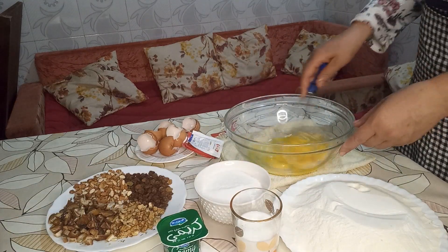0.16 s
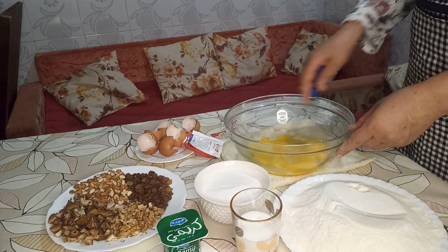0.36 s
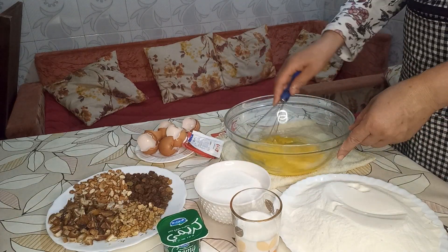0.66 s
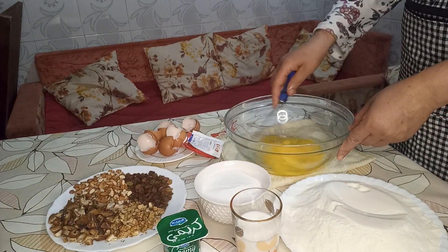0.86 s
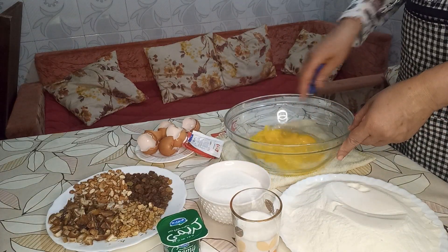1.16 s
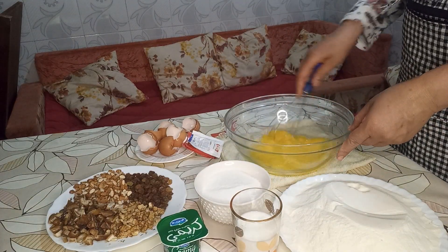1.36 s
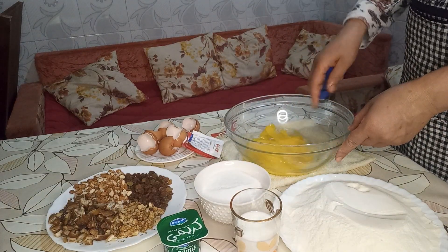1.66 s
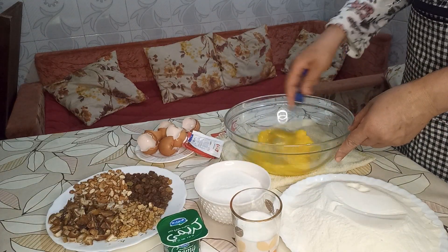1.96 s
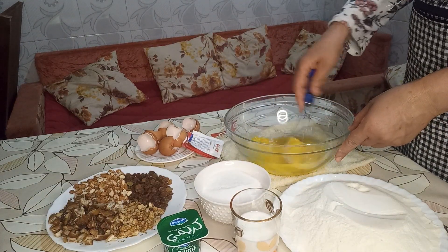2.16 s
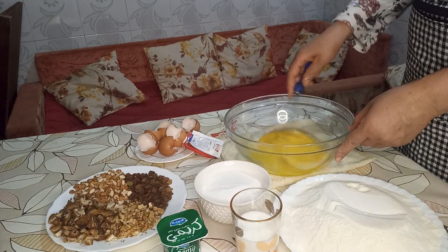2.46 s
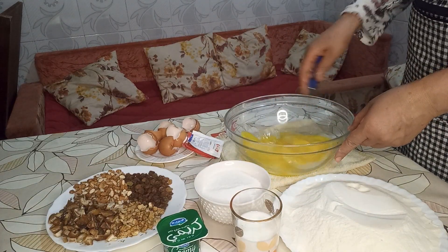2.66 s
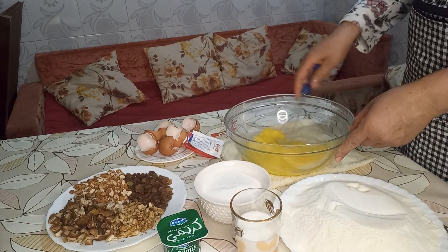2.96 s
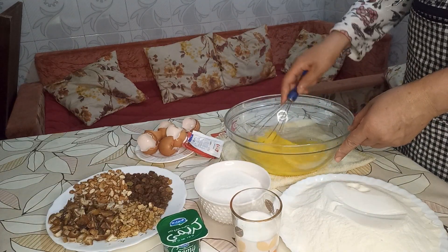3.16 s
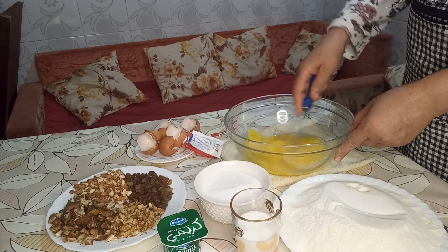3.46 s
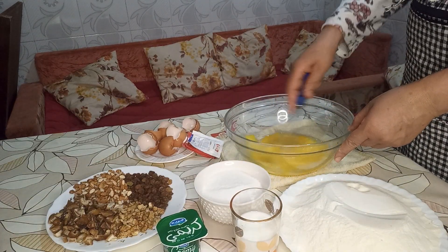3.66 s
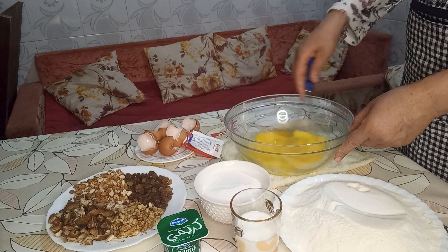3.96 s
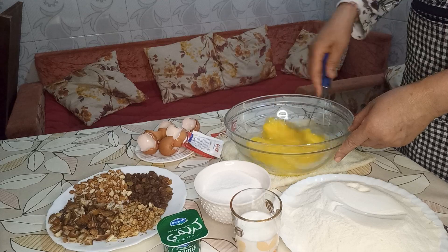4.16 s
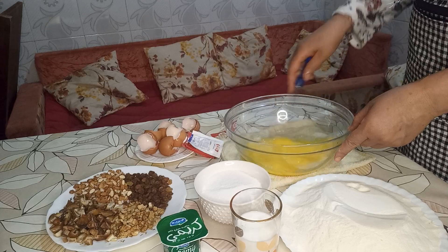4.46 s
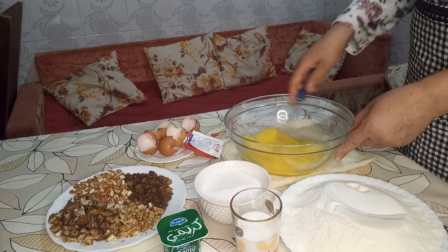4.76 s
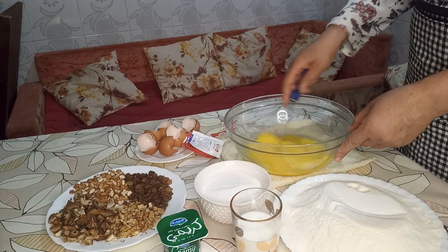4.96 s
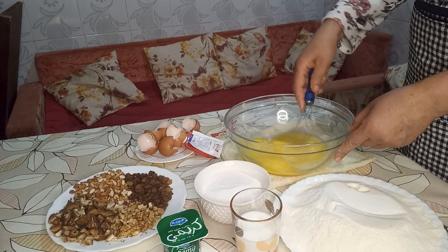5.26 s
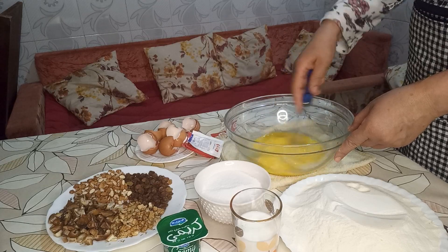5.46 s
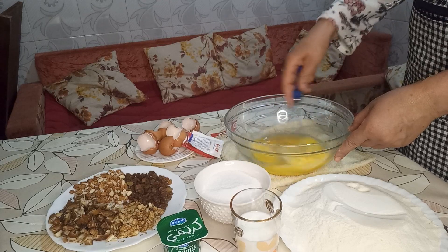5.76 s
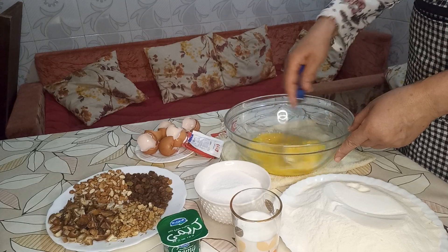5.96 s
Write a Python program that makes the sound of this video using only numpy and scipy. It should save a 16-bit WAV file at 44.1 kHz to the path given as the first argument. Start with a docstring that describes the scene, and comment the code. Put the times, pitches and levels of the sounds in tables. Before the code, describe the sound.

Eggs are whisked by hand in a thick glass bowl on a table. Bright wires drag and rattle against the wall, egg swishes, and air pockets pop with short liquid pitches. It starts fairly light, rings the bowl now and then, and turns more vigorous in the second half, ending mid-stroke. Short lively room echoes blur it; a small nearby microphone picks up little deep bass.

```python
"""A wire whisk beats raw eggs in a thick glass bowl on a table, in a bare, lively room with a faint hush.
From the start, four to five sweeps a second drag wires on glass and slosh the egg, while air pockets pop
as pitched, fading sines and wires tick as noise bursts that ring the wall; echoes blur egg and wires.
A blow near 1.5 s rings the bowl's upper deep tone, one near 2.7 s rings both; from 3.6 s strokes and pops are
mostly stronger. The strongest pop comes near 5.4 s, and the sound ends at 6.1 s in mid-beating."""
import sys
import numpy as np
from scipy import signal
from scipy.fft import rfft, irfft
from scipy.io import wavfile
from scipy.ndimage import uniform_filter1d

SR = 44100
rng = np.random.default_rng(int(sys.argv[2]) if len(sys.argv) > 2 else 0)


def wav_out(sig):
    """Save sig, one row per channel (or a flat mono array), as 16-bit PCM at SR to the path in sys.argv[1]."""
    wavfile.write(sys.argv[1], SR, np.round(np.clip(np.atleast_2d(sig).T, -1, 1) * 32767).astype(np.int16))


N = 269967

# Colour of the room hush. Each row: frequency in Hz, relative level in dB.
HUSH_COLOUR = [(25, -12.5), (100, -3), (300, -15.5), (900, -45), (2000, -2), (7000, -20), (8500, -24),
               (16500, -27)]
# How long the room's echoes last. Each row: frequency in Hz, time to fade by 60 dB in seconds.
ROOM_T60 = [(200, 0.33), (700, 0.4), (2000, 0.32), (6000, 0.25), (15000, 0.25)]
# Sweeps of the whisk at their height. Each row: time in seconds, level in dB of wires dragging on glass
# (before a trim), of egg sloshing (before a trim), of the bowl rocking on the table.
STROKES = [(0.018, -53.5, -50, -67), (0.279, -52.5, -53, -93), (.46, -50.5, -56, -97), (.69, -51, -49, -87),
           (0.908, -48, -80, -77), (1.1, -51.5, -72, -92), (1.35, -49.5, -60.5, -96),
           (1.5, -54, -50.5, -78), (1.661, -53.5, -49, -93), (1.861, -51, -53, -78),
           (2.078, -48.5, -55, -72), (2.29, -47.5, -58.5, -84), (2.54, -51, -52, -78),
           (2.768, -44, -47, -74), (2.99, -47, -53, -64.5), (3.189, -46.5, -49.5, -88),
           (3.418, -48.5, -47.5, -88), (3.652, -39.5, -44, -72), (3.86, -50.5, -49, -69),
           (4.04, -55, -53, -75), (4.289, -43, -44.5, -65), (4.528, -40.5, -42, -61.5),
           (4.75, -51.5, -60, -80), (4.958, -46.5, -49, -73), (5.191, -48, -43.5, -72),
           (5.422, -46.5, -45.5, -70), (5.642, -46.5, -46.5, -74), (5.83, -49, -53.5, -66),
           (5.98, -74, -58, -68), (6.09, -42, -45.5, -73)]
# Air pockets bursting in the egg. Each row: start in seconds, peak level in dB before the filter and the balance,
# starting pitch in Hz, cycles to fade by 50 dB (never fewer than 2 are used).
POPS = [(0.0098, -35, 1210, 8), (0.0156, -31, 563, 27), (0.0557, -38.5, 520, 10), (0.0643, -31.5, 720, 6.5),
        (0.1021, -44, 527, 53), (0.1777, -45, 1190, 42), (0.2708, -33, 3460, 3.5), (0.2975, -41, 621, 12),
        (0.3863, -41, 3860, 39), (0.4162, -46, 1990, 51), (0.4311, -42, 1265, 28), (0.4337, -39, 3160, 13),
        (0.514, -35, 2200, 5), (0.5509, -40, 2010, 33), (0.6736, -38, 1280, 28), (0.6879, -33.5, 4170, 27),
        (0.8315, -50.5, 1450, 26), (0.8525, -39, 4160, 21), (0.9063, -36, 1370, 25),
        (0.9627, -33.5, 2480, 6.5), (0.964, -35.5, 3600, 22), (1.0554, -44, 1140, 3),
        (1.224, -50.5, 2200, 22), (1.3266, -39, 1920, 8), (1.4122, -39, 2560, 17), (1.4264, -28, 1980, 17),
        (1.4408, -36, 1184, 15), (1.5176, -34, 998, 27), (1.5373, -40, 972, 3), (1.6641, -36.5, 1920, 18),
        (1.748, -46.5, 866, 21), (1.7956, -40, 3640, 22), (1.8811, -38, 1930, 25),
        (2.0069, -40.5, 2450, 11), (2.248, -44.5, 1457, 30), (2.3007, -34, 3490, 27),
        (2.3697, -46.5, 1225, 38), (2.5342, -42, 4340, 43), (2.6331, -41, 1200, 26),
        (2.6796, -47, 3130, 42), (2.7093, -24, 2830, 7), (2.7167, -42.5, 1217, 30),
        (2.8173, -39.5, 2670, 15), (2.9103, -43, 2630, 26), (2.952, -37.5, 2140, 9),
        (3.0148, -32, 2200, 7.5), (3.0197, -41, 1220, 31), (3.0546, -23.5, 1160, 4.5),
        (3.1578, -34, 4650, 15), (3.2373, -34, 2660, 7), (3.2844, -34.5, 1050, 6), (3.2975, -41.5, 844, 29),
        (3.3348, -41, 2290, 40), (3.4495, -37, 1060, 3), (3.4697, -36.5, 1070, 16),
        (3.4805, -47.5, 577, 24), (3.6083, -28, 696, 22.5), (3.6254, -25, 1780, 27),
        (3.6955, -27.5, 660, 14), (3.7005, -32, 2520, 12), (3.7758, -36, 1310, 11),
        (3.827, -33.5, 667, 7.5), (3.8374, -29, 1190, 16), (3.8375, -21.5, 3100, 5),
        (3.8921, -29.5, 2600, 14), (3.9083, -39, 1860, 28), (3.9867, -44.5, 760, 20),
        (4.0248, -37, 4040, 19), (4.0348, -45.5, 687, 15), (4.0537, -41, 2170, 20),
        (4.1121, -42.5, 751, 42), (4.1143, -31, 2270, -1.5), (4.1252, -39.5, 1230, 28),
        (4.2448, -32.5, 2190, 22), (4.2604, -28, 1400, -4.5), (4.3281, -42, 710, 12),
        (4.3642, -44, 1210, 34), (4.4602, -36.5, 1360, 16), (4.5149, -29.5, 3960, 14),
        (4.5283, -28, 1410, 6.5), (4.5289, -32, 2660, 22), (4.5697, -34.5, 970, 5), (4.5803, -32, 2710, 22),
        (4.595, -34, 4240, 32), (4.596, -38, 2020, 18), (4.682, -40, 2040, 16), (4.65, -55.5, 573, 25),
        (4.703, -50.5, 472, 12), (4.8431, -34, 1440, 3), (4.9125, -27.5, 5040, 6.5),
        (4.9399, -32, 2230, 18), (4.9557, -33.5, 3760, 58), (5.0436, -47.5, 1300, 27),
        (5.1534, -44, 1390, 12), (5.1583, -33.5, 702, 14), (5.1866, -47, 1780, 38),
        (5.2308, -39.5, 2500, 18), (5.3221, -39, 722, 20), (5.3486, -42.5, 650, 17),
        (5.4276, -31.5, 2160, 23), (5.4299, -19, 4770, 0), (5.6234, -27, 3900, 20), (5.6287, -36, 725, 12),
        (5.6468, -29, 1970, 6), (5.7411, -42, 2010, 32), (5.806, -37, 650, 9), (5.808, -29, 1270, 1),
        (5.8414, -26.5, 3430, 6), (5.8458, -41, 944, 15), (6.0048, -37.5, 2050, 29), (6.035, -29, 737, 7.5),
        (6.0769, -38, 715, 22)]
# Colour of the wires dragging on glass. Each row: frequency in Hz, relative level in dB.
DRAG_COLOUR = [(1500, -16), (2500, -6), (4000, -7.5), (7000, -6), (8300, -14.5), (12000, -10.5),
               (14000, -9.5), (17000, -18.5)]
# The bowl's two deepest tones: pitches in Hz, lower tone first.
HUM_HZ = 391.8, 924.5
# Fading of the same two tones: time in seconds to fade by 60 dB, lower tone first.
HUM_T60 = 1.1, 0.57
# Blows that set the two deep tones anew, feeding or checking them.
# Each row: start in seconds, level in dB of the lower tone, level in dB of the upper tone.
HUM_BLOWS = [(0, -84, -68), (.81, -77, -92), (1.518, -87, -41), (2.066, -65.5, -79), (2.746, -48, -53),
             (2.967, -69, -84), (3.624, -60.5, -54), (3.837, -59, -54), (4.295, -69.5, -60),
             (4.513, -101, -51.5), (4.571, -67.5, -52), (5.428, -71.5, -56.5), (5.558, -56.5, -60),
             (5.62, -52.5, -55.5), (5.746, -49.5, -66), (5.84, -50, -56), (5.958, -49.5, -53),
             (6.035, -57.5, -47.5)]
# Modes of the bowl wall, damped by egg and hand: pitches in Hz.
GLASS_HZ = [1735, 2520, 2775, 3565, 4660, 5995, 7000, 7400, 8875, 10200, 10490, 11400, 12128, 12480, 13100,
            13910, 14900]
# The same modes in the same order. Each row: relative level in dB, time in seconds to fade by 60 dB.
GLASS_MODES = [(-12, 0.36), (-21, 0.14), (-4, 0.11), (-1.5, 0.053), (-9.5, 0.11), (-7.5, 0.036), (0, 0.055),
               (-4, 0.06), (4, 0.034), (-5, 0.14), (0.5, 0.032), (1, 0.053), (5, 0.094), (-13, .05),
               (7, 0.037), (7, 0.067), (-25, 0.044)]
# Wires striking the glass. Each row: start in seconds, level in dB before a trim, then three levels in dB
# against it: glass ring, first click, dull part muffled by egg.
TICKS = [(0.0152, -42.5, -25, 0, 5.5), (0.2443, -40.5, -33, -31, -20), (0.6611, -39.5, -27, -4, 9),
         (0.6759, -43, -17, -10, -13), (0.769, -47, -17, -25, 0), (0.8089, -36.5, -28, -35, -1.5),
         (0.894, -28, -36, -9, -8.5), (1.041, -63.5, 0, -21, -18), (1.0914, -39.5, -40, -17, 6.5),
         (1.4236, -43.5, -14.5, 3, 8), (1.517, -36, -37, -14, 3), (1.6551, -44.5, -20, -10, -7),
         (1.7945, -41, -28, -14, 4.5), (2.0633, -37.5, -18, -11, 3), (2.135, -67, -10, -21, 4),
         (2.249, -37.5, -29, -2, -0.5), (2.504, -48, -28, 7, 4.5), (2.5335, -45, -17, 6, -5),
         (2.7441, -28, -9, 5, -5), (2.952, -44.5, -22, 0, 9.5), (2.966, -65, -7, -15, 4),
         (3.1565, -47, -22, -12, 9), (3.2355, -40.5, -27, -25, 1), (3.391, -39.5, -22, -14, 7),
         (3.4481, -43, -21, -10, -6), (3.479, -34, -35, -20, 0), (3.6248, -34, -8, 15.5, -3.5),
         (3.8116, -36.5, -41, -31, -15), (4.0047, -34, -29, -7, 0), (4.114, -45, -39, 11, 6),
         (4.1885, -49, -9, 18.5, 3.5), (4.231, -39, -26, -11, -23), (4.2725, -38, -18, -14, -13),
         (4.2947, -29, -25, -3, -20), (4.393, -34, -40, 5, -4), (4.5134, -26, -21.5, 0, -2),
         (4.6335, -41, -31, -5, -26), (4.7453, -46, -26, 3, 7.5), (4.789, -51, -13, 5, -8),
         (4.9129, -44, -26, -8, 10), (5.1561, -38, -31, -6, 5), (5.3853, -38, -12, -22, 4),
         (5.5265, -36, -21.5, -1, 4), (5.6216, -30.5, -44, -17, -2), (5.7438, -36, -17.5, 4.5, -5.5),
         (5.9573, -32, -19, -7.5, -8), (6.0556, -37.5, -21, -13, -5), (6.0777, -36, -20, 6, 3.5)]
# Colour of the bright wire rattle. Each row: frequency in Hz, relative level in dB.
RATTLE_COLOUR = [(2500, -9.5), (4500, -7), (6500, 7.5), (8500, 2.5), (11000, 3), (14000, -3), (20000, 9)]


def from_db(db):
    """Turns dB into an amplitude factor."""
    return 10 ** (np.asarray(db) / 20)


def rms_one(x):
    """Scales a sound, all its channels together, to rms 1."""
    return x / np.sqrt(np.mean(x ** 2) + 1e-20)


def highpass(x, hz, order=2):
    """Thins out everything below hz."""
    return signal.sosfilt(signal.butter(order, hz, "high", fs=SR, output="sos"), x)


def bandpass(x, low, high, order=2):
    """Keeps the band between low and high in Hz."""
    return signal.sosfilt(signal.butter(order, [low, high], "band", fs=SR, output="sos"), x)


def at_hz(points, hz):
    """Reads a curve between its points on a logarithmic frequency scale."""
    freqs, values = np.array(points).T
    return np.interp(np.log(hz), np.log(freqs), values)


def coloured(x, spectrum):
    """Weights a full-length sound by a spectrum and brings it to rms 1."""
    hz = np.maximum(np.arange(N // 2 + 1) * SR / N, 1)
    return rms_one(irfft(rfft(x) * from_db(at_hz(spectrum, hz)), N))


def ring(clicks, hz, t60):
    """A resonator: a unit click sets a decaying sine of starting height about 1 ringing."""
    radius = from_db(-60 / (t60 * SR))
    angle = 2 * np.pi * min(hz / SR, .45)
    feedback = [1, -2 * radius * np.cos(angle), radius * radius]
    return signal.lfilter([0, np.sin(angle)], feedback, clicks + 1e-18)


def grains(per_s, spread_db):
    """Random clicks of uneven size and either sign."""
    sizes = from_db(spread_db * np.minimum(rng.exponential(1, N), 3.5))
    signs = rng.choice([-1, 1], N)
    return sizes * signs * (rng.random(N) < per_s / SR)


def add(out, sound, s):
    """Lays a sound into the layer at s seconds, cut off at the end."""
    at = round(s * SR)
    out[..., at:at + sound.shape[-1]] += sound[..., :max(N - at, 0)]


def sweeps(column, rise_s, fall_s, rest_db):
    """Level in dB of a layer: sweeps that grow and fade, by a factor e per rise_s or fall_s, over a resting level."""
    rows = np.array(STROKES)
    t = np.arange(0, N + 64, 64) / SR  # one point every 64 samples
    age = t - rows[:, :1]
    decay = np.where(age < 0, -age / rise_s, age / fall_s)
    power = from_db(2 * rows[:, column, None]) * np.exp(-2 * decay)
    level_db = 10 * np.log10(power.sum(axis=0) + from_db(2 * rest_db))
    return np.interp(np.arange(N) / SR, t, level_db)


def hush():
    """Steady coloured noise, nearly independent in the two channels."""
    noise = rng.standard_normal((2, N))
    return from_db(-70) * coloured(noise + 0.024 * noise[::-1], HUSH_COLOUR)


def room(x):
    """Dense echoes, unlike in the two ears, dying faster in the treble; they begin with the table bounce."""
    alike_below_hz = 300  # the echoes grow alike in both channels towards the bass
    age = np.arange(int(.6 * SR)) / SR
    edges = 40 * 2 ** np.arange(0, 9.1, .5)  # half-octave bands
    tail = 0
    for low, high in zip(edges, edges[1:]):
        band = bandpass(rng.standard_normal((2, len(age))), low, high)
        band = band + band[::-1] * 0.81 / (1 + (low / alike_below_hz) ** 2)
        t60 = at_hz(ROOM_T60, np.sqrt(low * high))
        tail = tail + band * from_db(-60 * age / t60)
    tail = tail * np.clip((age - .003) / 0.0019, 0, 1)  # silent for 3 ms, then fades in
    tail = tail / np.sqrt(np.sum(tail ** 2) / 2)
    return signal.fftconvolve(x[None], tail, axes=1)[:, :N]


def rocking():
    """The bowl rocks on the table: low noise that thuds with the stronger sweeps, almost still in others."""
    level_db = sweeps(column=3, rise_s=0.013, fall_s=0.029, rest_db=-85.5)
    thud = bandpass(rng.standard_normal((2, N)), 90, 210, order=3)
    return from_db(level_db) * rms_one(thud + 0.35 * thud[::-1])


def slosh():
    """Countless small bubbles over two octaves, each fading by 60 dB in fifteen cycles."""
    level_db = sweeps(column=2, rise_s=0.084, fall_s=0.068, rest_db=-91)
    pitches = np.geomspace(1150, 5000, 24)
    born = grains(900, spread_db=8.0)
    dealt = rng.integers(0, len(pitches), N)  # which pitch each bubble gets
    bubbles = sum(ring(born * (dealt == k), hz, 15 / hz) for k, hz in enumerate(pitches))
    bubbles = highpass(bubbles, 1050, order=4)  # soft births leave no thump
    return from_db(level_db - 6) * rms_one(bubbles)


def pops():
    """A pocket swells for a cycle, then rings out while its pitch climbs a little."""
    out = np.zeros(N)
    for s, db, hz, cycles in POPS:
        turns = np.arange(int(.08 * SR)) / SR * hz
        swell = (1 - np.exp(-turns / .8)) ** 2
        shape = swell * from_db(-50 * turns / max(cycles, 2))
        tone = shape / shape.max() * np.sin(2 * np.pi * turns * (1 + 0.00063 * turns))
        add(out, from_db(db) * highpass(tone, hz / 2), s)
    return out


def drag():
    """Wires scrape along the glass: thousands of tiny coloured clicks a second."""
    level_db = sweeps(column=1, rise_s=0.039, fall_s=0.091, rest_db=-90)
    slips = np.array([grains(3300, spread_db=5.0), grains(3000, spread_db=6.0)])
    return from_db(level_db - 8.0) * coloured(slips + .5 * slips[::-1], DRAG_COLOUR)


def hum():
    """Each deep tone of the bowl leaps to the level the latest blow leaves it with and fades from there."""
    t = np.arange(N) / SR
    starts, *levels = np.transpose(HUM_BLOWS)
    latest = np.maximum(np.searchsorted(starts, t) - 1, 0)
    since_blow = t - starts[latest]
    out = 0
    for hz, t60, level_db in zip(HUM_HZ, HUM_T60, levels):
        size = from_db(level_db[latest] - 60 * since_blow / t60)
        size = uniform_filter1d(size, size=300)  # rounds each leap over 300 samples
        out = out + size * np.sin(2 * np.pi * hz * t)
    return out


def glass(blows):
    """Every blow rings every mode of the wall, a decaying sine each."""
    rings = 0
    for hz, (db, t60), blow in zip(GLASS_HZ, GLASS_MODES, blows):
        rings = rings + from_db(db) * ring(blow, hz, t60)
    return highpass(rings, 900)  # thin wires give no thump


def ticks():
    """The first wire clicks, the others follow as a lumpy noise rattle; also returns the blows on the glass."""
    bright, dull = np.zeros((2, N)), np.zeros((2, N))
    blows = np.zeros((len(GLASS_MODES), 2, N))
    age = np.arange(int(.1 * SR)) / SR
    noise = rng.standard_normal((len(TICKS), 2, len(age)))
    # uneven rattle, a new size every 40 samples
    steps = np.minimum(rng.exponential(1, (len(TICKS), len(age) // 40 + 1)), 3)
    lumps = from_db(3.84 * steps).repeat(40, axis=1)[:, :len(age)]
    # each mode's strength varies from blow to blow, partly alike in both channels
    luck = rng.standard_normal((len(TICKS), len(GLASS_MODES), 3))
    share = from_db(luck @ [[4, 4], [2, 0], [0, 2]])
    share = share * rng.choice([-1, 1], share.shape, p=[.3, .7])  # a node line may face either channel
    for k, (s, db, ring_db, click_db, dull_db) in enumerate(TICKS):
        click = from_db(click_db) * np.exp(-age / 0.0014)
        follow = 0.34 * lumps[k] * (1 - np.exp(-age / 0.00028)) * np.exp(-age / 0.016)
        stereo = noise[k] + 0.05 * noise[k, ::-1]
        rattle = from_db(db - 2.5) * stereo * (click + follow)
        add(bright, rattle, s)
        add(dull, from_db(dull_db) * rattle, s)
        add(blows, from_db(db + ring_db) * share[k, ..., None], s)
    muffled = bandpass(dull, 1200, 5000)  # wires buried in egg
    bright_rms = np.sqrt(np.mean(bright ** 2))
    return bright_rms * coloured(bright, RATTLE_COLOUR) + muffled, blows


def scene():
    """Mixes egg, wires and bowl with the room around them."""
    rattle, blows = ticks()
    wires = rattle + glass(blows) + drag()
    egg = highpass(pops() + slosh(), 300)  # small pockets radiate no bass
    # the bowl stands a little nearer the right: egg comes there 3 samples sooner, though 1.5 dB softer
    near = wires + [np.roll(egg, 3), from_db(-1.5) * egg]
    echoes = from_db(0.5) * room(egg + from_db(-0.5) * wires[0])
    left_over_right_db = 1.44
    balance = from_db([[left_over_right_db / 2], [-left_over_right_db / 2]])
    return (near + echoes + hum() + rocking() + hush()) * balance


def record(dry):
    """The small microphone drops the deep bass; the top is cut steeply, fully down by 16.5 kHz."""
    thin = highpass(dry, 70)
    return signal.sosfilt(signal.cheby2(20, 70, 16500, fs=SR, output="sos"), thin)


dry = scene()
out = record(dry)
wav_out(out)
```